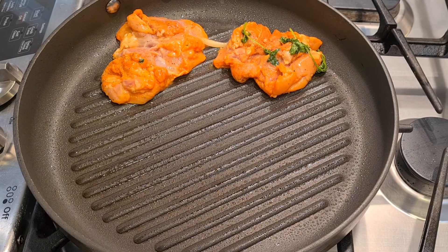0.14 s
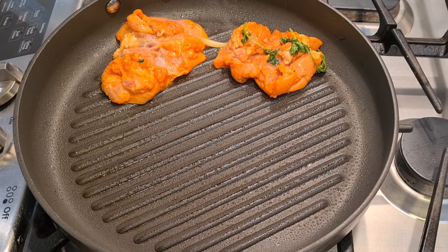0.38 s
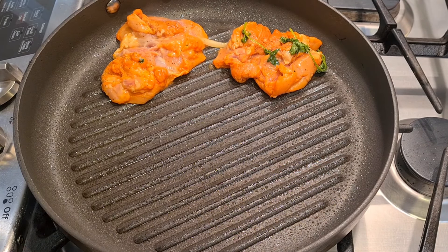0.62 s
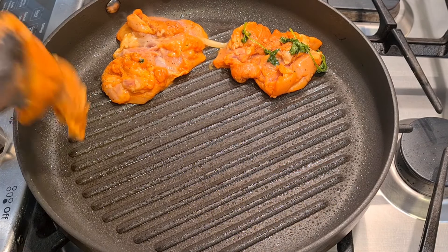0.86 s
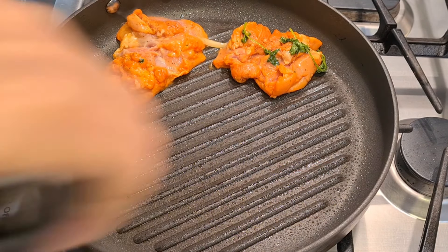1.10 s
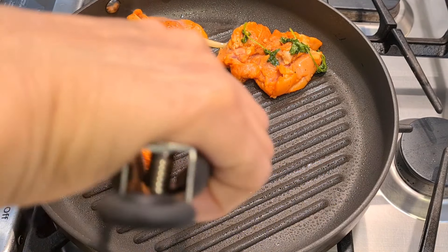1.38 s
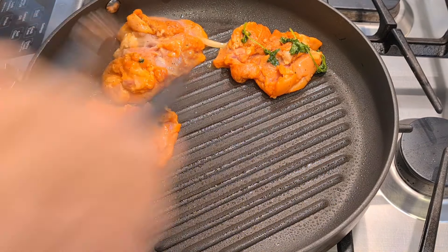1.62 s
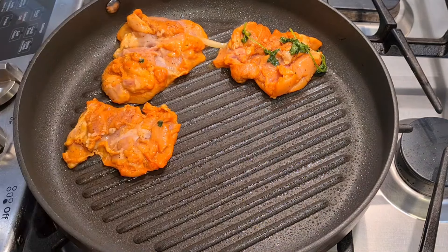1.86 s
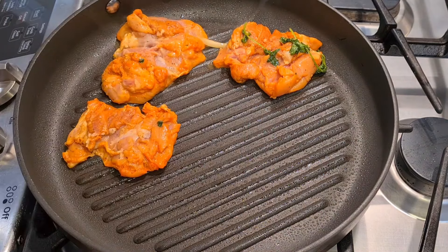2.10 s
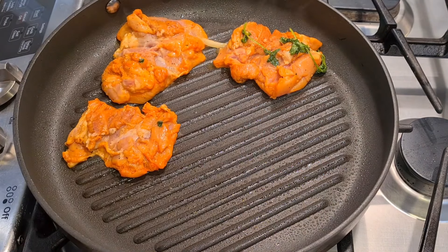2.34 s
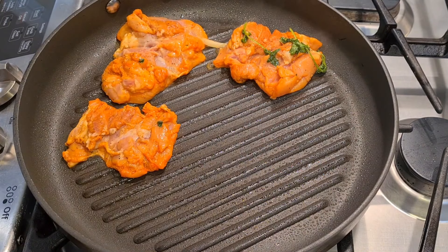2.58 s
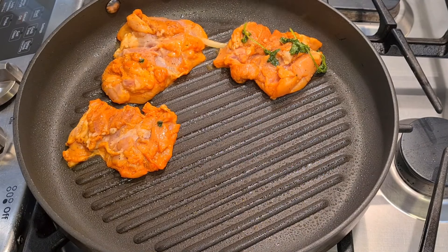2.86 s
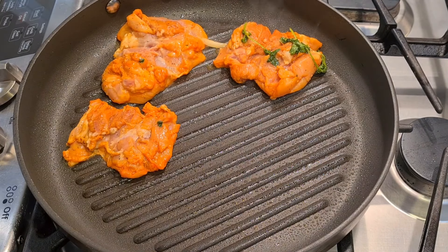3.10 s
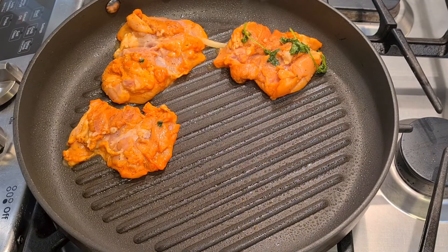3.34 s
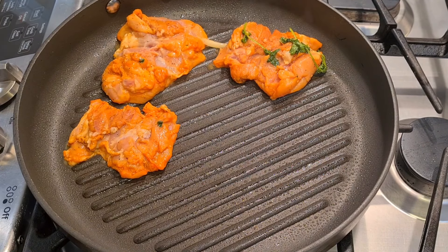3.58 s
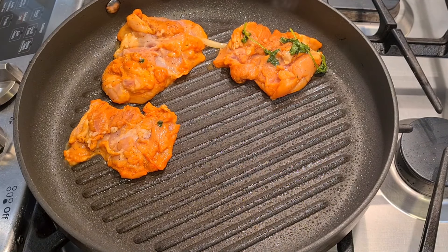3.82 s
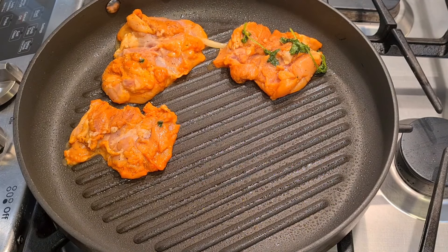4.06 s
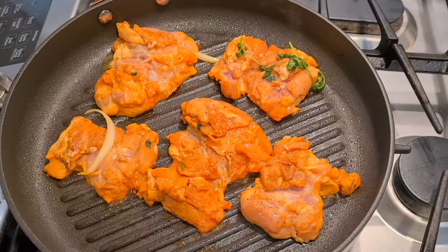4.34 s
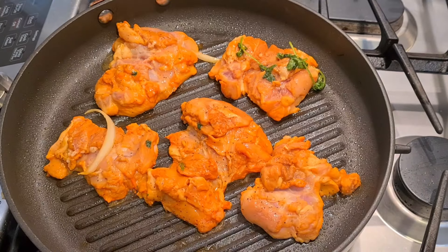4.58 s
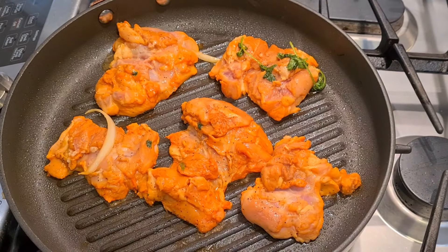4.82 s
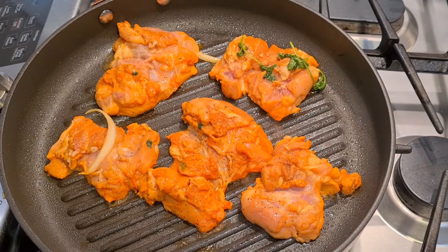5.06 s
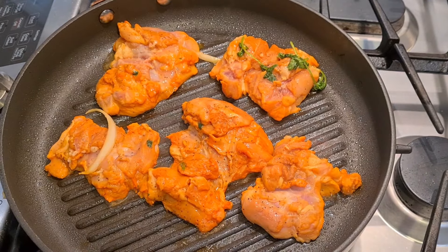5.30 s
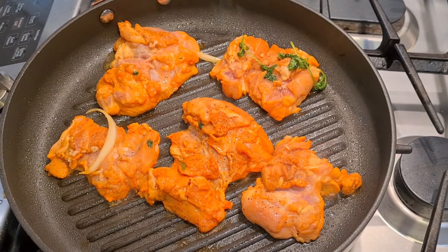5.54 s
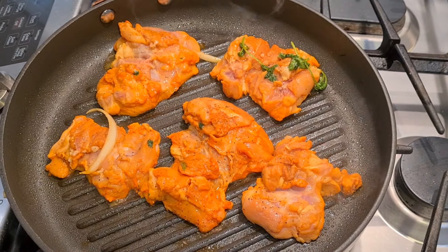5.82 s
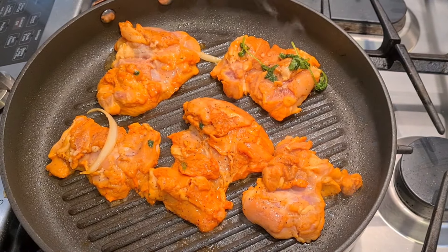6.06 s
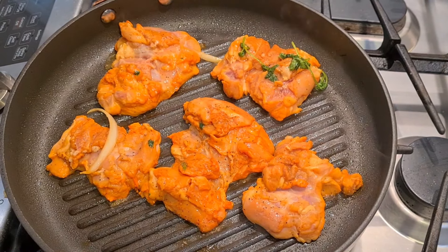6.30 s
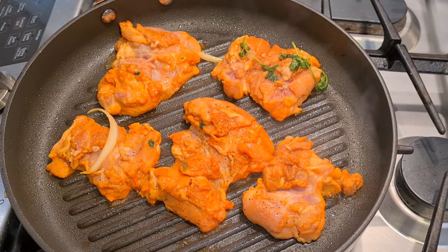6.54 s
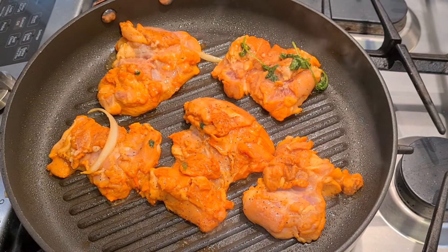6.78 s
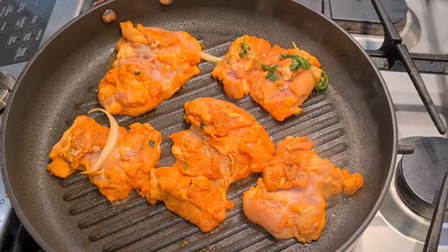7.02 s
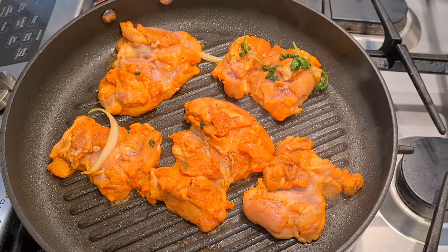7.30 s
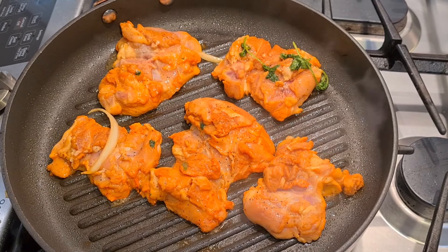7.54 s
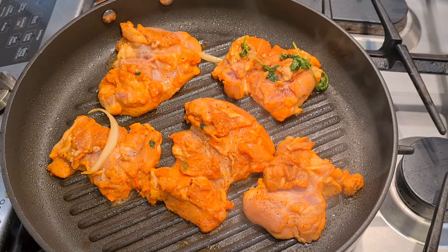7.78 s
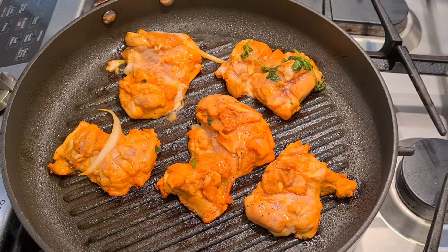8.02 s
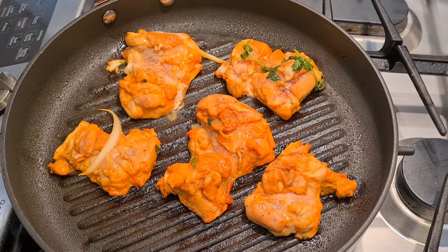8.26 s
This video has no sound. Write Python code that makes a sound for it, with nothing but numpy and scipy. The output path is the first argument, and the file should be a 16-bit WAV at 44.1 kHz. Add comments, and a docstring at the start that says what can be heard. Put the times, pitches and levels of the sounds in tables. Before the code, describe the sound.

Close, bright frying sizzle with crackling fat spits over a faint extractor fan rumble, jumping midway to a smoother, quieter hiss.

```python
"""Marinated meat sizzles on a hot ridged pan just under a two-port microphone in a kitchen. Bursting bubbles
are noise under random bursts; a fresh piece is laid down, then a jump in time leads to a full pan, sizzling
softer. Fat spits in sharp cracks of noise and the iron rings in resonant modes. A hand near the right port
twice throws a close echo; an extractor fan, shaped noise and sines, rumbles and hums beneath; weak lows flicker
in and out."""
import sys
import numpy as np
from scipy import signal
from scipy.fft import rfft, irfft
from scipy.io import wavfile
from scipy.ndimage import uniform_filter1d

SR = 44100
rng = np.random.default_rng(int(sys.argv[2]) if len(sys.argv) > 2 else 0)


def int16_out(signal):
    """Quantize to a 16-bit WAV file."""
    q = np.round(np.clip(np.atleast_2d(signal).T, -1, 1) * 32767)
    wavfile.write(sys.argv[1], SR, q.astype(np.int16))


def attenuation_scalar(level_db):
    """Turn a level in dB into a linear amplitude multiplier (20 dB per decade)."""
    decades = np.asarray(level_db, float) / 20
    return 10 ** decades


N = 369999
WIN, HOP = 1024, 256  # short-time spectra of the sizzle, samples
CALMS_S, JUMP_S = 2.6, 4.743  # the new piece calms; jump in time to the full pan

# level of the sizzle before its lifts and patches: t/s, level/dB
SIZZLE_LEVEL = [(0, -25), (.98, -25.5), (1.04, -27), (1.34, -26), (1.55, -25.5), (1.8, -23.5), (2.2, -23),
                (2.6, -23), (2.84, -23.5), (2.92, -24), (3.75, -24), (3.92, -24.5), (4.735, -25),
                (4.75, -27.5), (6.55, -28.5), (8.2, -28), (8.32, -30.5)]


def curve(table, at, log=False):
    """Columns of a table joined by straight lines, in time or on a log-frequency axis."""
    x, *columns = np.transpose(table)
    bend = np.log if log else np.asarray
    return [np.interp(bend(at), bend(x), c) for c in columns]


def unit(x):
    """Scale to rms 1."""
    return x / np.sqrt(np.mean(np.abs(x) ** 2))


def walk(shape, span):
    """Random drift, smoothed twice over span cells along each axis; rms 1."""
    x = rng.standard_normal(shape)
    for axis, cells in enumerate(span):
        for _ in range(2):
            x = uniform_filter1d(x, max(int(cells), 1), axis=axis)
    return unit(x)


def hump(hz, centre_hz, octaves):
    """Bell on the octave axis, 1 at its centre."""
    return np.exp(-(np.log2(hz / centre_hz) / octaves) ** 2)


def frames(x):
    """Short-time spectra: frequencies, times, cells."""
    return signal.stft(x, SR, nperseg=WIN, noverlap=WIN - HOP)


def bursts(per_s, spread_db, tail_ms, steam):
    """Envelope of bursting bubbles, many small and few large, in flurries over a smooth jet of steam."""
    struck = rng.random(N) < per_s / SR
    size = struck * attenuation_scalar(spread_db * np.minimum(rng.exponential(size=N), 6))
    keep = np.exp(-1000 / (tail_ms * SR))
    pops = unit(signal.lfilter([1], [1, -keep], size))
    flurry_db = 0.1 * walk((N,), (900,)) + 0.51 * walk((N,), (150,))
    return (steam + pops) * attenuation_scalar(flurry_db)


def bubbles():
    """Noise under the bursts: large bubbles carry the lower sizzle, small ones the upper."""
    smooth = np.where(np.arange(N) > JUMP_S * SR, 1.155, 1)  # the full pan hisses smoother
    small = bursts(per_s=2500, spread_db=2.1, tail_ms=.2, steam=3.5 * smooth)
    big = bursts(per_s=1200, spread_db=1.8, tail_ms=.5, steam=5 * smooth)
    hz, s, small = frames(unit(small) * rng.standard_normal((3, N)))
    big = frames(unit(big) * rng.standard_normal((3, N)))[2]
    hz = np.maximum(hz, 1)[:, None]
    # large ones alone sound below 3440 Hz, small ones alone an octave above
    high = np.clip(np.log2(hz / 3440), 0, 1)
    return hz, s, np.sqrt(high) * small + np.sqrt(1 - high) * big


def fresh(s):
    """Share of the new piece in the sizzle, and the rise and fall (0-1) of its first flash of steam."""
    lands_s, take_over_s, flash_peak_s = 1.23, 0.18, 0.11
    age = np.maximum(s - lands_s, 0)
    full_share = np.where(s < CALMS_S, 0.82, 0.88)
    share = full_share * (1 - np.exp(-age / take_over_s))
    flash = age / flash_peak_s * np.exp(1 - age / flash_peak_s)
    return share, flash


def meats(hz, s, share):
    """Each meat colours the sizzle and reaches the ports its own way: power, left-right dB, left's lead ms."""
    # colours of the settled pieces, the new piece and the full pan: f/Hz, relative density/dB per Hz
    settled, spitting, full = [(560, -35), (950, -9), (1300, -6), (1780, -4), (2080, -8), (2300, -5),
                               (3600, -2.5), (4050, -4), (5400, -2.5), (6300, .1), (8000, .1), (10300, -3),
                               (13000, -4), (15000, -7.5), (15900, -10)], [(560, -30), (950, -6), (1060, -7), (1290, -2.5),
                                                (1890, -2.5), (2160, -6), (2740, -2), (4180, .1),
                                                (4710, -.7), (6500, -.4), (10400, -5.5), (13700, -3),
                                                (15000, -5.5), (15900, -8.5)], [(560, -21.5), (950, -14.5), (1190, -12),
                                                                  (1450, -7.5), (1610, -10.5), (2060, -9.5),
                                                                  (2230, -12.5), (3210, -5), (3570, -7.5),
                                                                  (4560, -7), (5370, -6), (8690, -10.5),
                                                                  (13400, -13), (15600, -15)]
    # left port over right, for the same three: f/Hz, level/dB
    settled_side, spitting_side, full_side = [(300, -7), (900, 1.5), (4500, 2), (6300, 5.5), (8200, 12),
                                              (10300, 8), (11800, 2), (14500, -0.5)], [(300, 4), (900, 3.5), (4300, 0),
                                                                    (6000, 2.5), (7900, 8), (10300, 1.5),
                                                                    (12000, -4.5), (14500, -6)], [(300, -1),
                                                                                           (900, 2.5),
                                                                                           (4200, 2.5),
                                                                                           (5500, 5),
                                                                                           (7800, 10),
                                                                                           (9000, 9),
                                                                                           (10300, 7.5),
                                                                                           (11300, -1),
                                                                                           (14500, -1)]
    # time by which the left port leads, one value each for the same three [ms]
    left_lead = (.09, .17, .1)
    late = s > JUMP_S
    colours = settled, spitting, full
    sides = settled_side, spitting_side, full_side
    weights = (1 - share) * ~late, share * ~late, late
    power, side_db, lead_ms = 0, 0, 0
    for colour, side, weight, ms in zip(colours, sides, weights, left_lead):
        shape = attenuation_scalar(curve(colour, hz, log=True)[0]) ** 2
        power = power + weight * shape / shape.mean(axis=0)
        side_db = side_db + weight * curve(side, hz, log=True)[0]
        lead_ms = lead_ms + weight * ms
    return power, side_db, lead_ms


def passing_lifts(hz, s, flash):
    """Steam, flaring juice and crowding bubbles lift ranges of pitch; others stand out or fall back, in dB."""
    # juice runs onto hot iron and flares at once, then dies away: t/s, lift/dB
    flares = [(1.45, 1), (1.53, 1), (1.66, 1), (1.8, 1.5), (2.217, 2.5), (2.457, 2)]
    # for a while one range of pitch stands out or falls back:
    # from t/s, to t/s, centre f/Hz, width/octaves, level/dB
    pitch_ranges = [(0, .8, 2800, 0.54, -1), (1.6, 2.1, 4150, 0.27, -2), (1.8, 2.603, 12200, .4, 1.5),
                    (2.2, 3.9, 3130, 0.48, 1), (3.1, 4.103, 1390, 0.74, -0.8)]
    early, calm = s <= JUMP_S, s >= CALMS_S
    # bubbles of one size crowd into a band, first with the flash of steam, then steadily
    bubble_hz = np.where(calm, 8600, 6100)
    bubble_db = np.where(calm, 1.6, 0.5 * flash)
    lift_db = bubble_db * early * hump(hz, bubble_hz, .35)
    # the flash also lifts the lows, fully below 2 kHz
    lift_db = lift_db + 1.5 * flash ** 2 * np.clip(np.log2(4000 / hz), 0, 1)
    # finest bubbles once the new piece has calmed
    lift_db = lift_db + 2.5 * (calm & early) * hump(hz, 11900, .25)
    # the sizzle swells briefly around 1.4 kHz
    lift_db = lift_db + 5.5 * np.exp(-((s - 1.64) / 0.13) ** 2) * hump(hz, 1360, 0.15)
    fade_s = 0.25
    flare_db = sum(db * (s >= at) * np.exp(-np.abs(s - at) / fade_s) for at, db in flares)
    lift_db = lift_db + flare_db * hump(hz, 5630, 0.76)
    for start, end, centre_hz, octaves, db in pitch_ranges:
        on = np.clip(np.minimum(s - start, end - s) / .1 + .5, 0, 1)
        lift_db = lift_db + db * on * hump(hz, centre_hz, octaves)
    return lift_db


def hand(s):
    """Delay (ms), strength and low lift (dB) of the close echo: stronger and earlier as the hand nears."""
    # drifts towards the right port: start t/s, time to arrive/s, end t/s, echo strength/0-1, low lift/dB
    visits = [(3.76, 0.25, 4.743, 0.28, 5.5), (7.6, 0.9, 8.25, 0.37, 10)]
    start_ms, shrink_ms, slows_s = 0.282, 0.067, 0.39
    delay_ms, echo, cup_db = 0, 0, 0
    for start, arrive, end, strength, lift_db in visits:
        near = (s > start) & (s < end)
        closing = 1 - np.exp(-np.abs(s - start) / slows_s)
        delay_ms = delay_ms + near * (start_ms - shrink_ms * closing)
        arrived = near * np.clip((s - start) / arrive, 0, 1)
        echo, cup_db = echo + strength * arrived, cup_db + lift_db * arrived
    return delay_ms, echo, cup_db


def cupped(right, hz, s):
    """The hand at the right port adds a delayed copy, lifts the treble and resonates like a cup."""
    delay_ms, echo, cup_db = hand(s)
    right = right * (1 + echo * np.exp(-2j * np.pi * hz * delay_ms / 1000))
    treble = np.clip(np.log2(hz / 7000), 0, 1)
    right = right * attenuation_scalar(10.5 * echo * treble)  # dB per unit of echo strength, full from 14 kHz
    return right * attenuation_scalar(cup_db * hump(hz, 1490, 0.38))


def sizzle():
    """Bubble bursts coloured by whichever meat makes them, partly alike at the two ports."""
    # likeness of the ports: f/Hz, shared power/0-1
    likeness = [(300, .5), (900, .45), (1150, .62), (1600, .6), (1900, .45), (2300, .25), (4000, .24),
                (6000, .12), (9000, .22), (15000, .08)]
    hz, s, (common, left, right) = bubbles()
    share, flash = fresh(s)
    power, side_db, lead_ms = meats(hz, s, share)
    # patches of the pan flare up and die down, each with its own range of pitch
    patchy_db = 0.23 * walk(power.shape, (30, 8)) + .5 * walk(power.shape, (80, 3))
    level_db = curve(SIZZLE_LEVEL, s)[0] + passing_lifts(hz, s, flash) + patchy_db
    gain = unit(np.sqrt(power)) * attenuation_scalar(level_db)
    alike = curve(likeness, hz, log=True)[0]
    lead = np.exp(2j * np.pi * hz * lead_ms / 1000)
    left = np.sqrt(alike) * common * lead + np.sqrt(1 - alike) * left
    right = cupped(np.sqrt(alike) * common + np.sqrt(1 - alike) * right, hz, s)
    right_share = 1 / (1 + attenuation_scalar(side_db) ** 2)
    balanced = np.array([left * np.sqrt(1 - right_share), right * np.sqrt(right_share)])
    ports = gain * np.sqrt(2) * balanced
    return signal.istft(ports, SR, nperseg=WIN, noverlap=WIN - HOP)[1][:, :N]


def spits():
    """Each spit of fat is a sharp broad crack, much alike at both ports; small ones come at random."""
    # larger fat spits: t/s, peak level/dB, left over right/dB
    large = [(.410, -14, 5), (.478, -13, 4), (.681, -13, 4), (1.327, -16, 2), (1.594, -15, -2),
             (1.602, -15, 2), (1.6605, -13, 4), (1.715, -13, 2), (1.835, -9, 2), (1.851, -10, 2),
             (2.133, -11, 2), (2.305, -11, 2), (2.567, -10, 1), (2.585, -11, 1), (3.153, -12, 0),
             (4.289, -12, -3), (4.346, -12, -2), (5.831, -14, 3), (6.284, -16, 3), (7.350, -16, 3),
             (1.756, -11, 3), (1.8015, -8, 1), (2.007, -11, 2), (2.017, -9, 2), (2.218, -10, 3),
             (2.4565, -11, 1), (2.661, -12, 1), (2.731, -9, 2), (2.776, -12, -1), (2.8342, -4, 2),
             (3.005, -9, -4), (3.562, -11, -4), (4.126, -11, 4), (4.605, -10, -4), (.518, -15, 5),
             (1.175, -16, 3), (1.896, -12, 0), (2.2766, -12, -1), (3.1865, -11, 0), (3.3356, -14, -3),
             (3.6315, -13, -3), (3.68, -13, 4), (4.0285, -13, 4), (4.5145, -13, 3), (4.7233, -12, -3),
             (5.5023, -16, 3), (6.0892, -17, 3), (7.1, -16, 3)]
    out, t = np.zeros((2, N)), np.arange(160) / SR
    small = rng.random((int(22 * JUMP_S), 3))  # 22 per second until the pan is full
    at = small[:, 0] * JUMP_S
    small_db = curve(SIZZLE_LEVEL, at)[0] + 11 + 4 * (small[:, 1] - .5)  # peaks 9 to 13 dB over that level
    rows = large + list(zip(at, small_db, 8 * small[:, 2] - 2))
    crack = rng.standard_normal((len(rows), 3, 160)) * np.exp(-t / .0004)
    crack = crack[:, :1] + .8 * crack[:, 1:]  # one common part, one of each port's own
    crack = signal.lfilter(*signal.butter(1, [2000, 13000], "band", fs=SR), crack)
    for (s, db, pan_db), burst in zip(rows, crack):
        peak = attenuation_scalar(db + np.array([[pan_db], [-pan_db]]) / 2)
        start = int(s * SR)
        out[:, start:start + 160] += peak * burst / np.abs(burst).max(axis=1, keepdims=True)
    return out


def iron():
    """The boiling juice shakes the pan, which answers in its modes, almost alike at both ports."""
    # modes of the pan, lowest first, a broad one last: f/Hz, width/Hz, relative level/dB
    pan_modes = [(460.4, 14, -0.5), (616, 60, -6), (781, 45, -6.5), (930, 90, -5.5), (685, 520, -8)]
    # level of the whole ring: t/s, level/dB
    ring_level = [(0, -59.5), (1.28, -56), (1.36, -47.5), (1.92, -46), (2.5, -48), (2.65, -49.5),
                  (3.6, -50.5), (3.9, -53.5), (4.71, -52), (4.8, -62.5), (8.39, -61)]
    # lift of the upper modes against the lowest: t/s, level/dB
    upper_lift = [(0, -3.5), (1.3, -3.5), (1.45, -5), (1.65, 3), (2.5, 2.5), (3.3, -1), (4.2, 3), (4.7, -3),
                  (8.39, -3)]
    t = np.arange(N) / SR
    shake = rng.standard_normal((3, N))
    shake = shake[0] + .5 * shake[1:]
    modes = []
    for hz, width, db in pan_modes:
        mode = unit(signal.lfilter(*signal.iirpeak(hz, hz / width, SR), shake, axis=1))
        modes.append(attenuation_scalar(db) * mode * attenuation_scalar(0.5 * walk((N,), (1500,))))  # each flutters on its own
    upper = sum(modes[1:]) * attenuation_scalar(2.5 * np.array([[.5], [-.5]]))  # left over right, dB
    upper = np.array([upper[0], np.roll(upper[1], 6)])  # left leads by 6 samples
    ring = modes[0] + upper * attenuation_scalar(curve(upper_lift, t)[0])
    return ring * attenuation_scalar(curve(ring_level, t)[0] + 0.1 * walk((N,), (3500,)))


def fan():
    """Moved air is shaped noise, the motor three wavering sines; the deepest part swells, all a little right."""
    # colour of the rush of air: f/Hz, relative density/dB per Hz
    air_colour = [(15, 4), (30, -8), (60, 2), (130, -2.5), (180, -10), (250, -9.5), (330, -8), (420, -14),
                  (520, -5.5), (900, -5), (1300, -25)]
    # swell of the deepest rumble and lowest hum: t/s, relative level/dB
    deep_swell = [(0, 0.5), (.7, -3.5), (1.9, -5), (2.2, -2), (4.3, 0), (5.1, -6), (6.5, -1.5),
                  (8.39, -2.5)]
    # murmur between 180 and 540 Hz, and the highest hum: t/s, relative level/dB
    murmur_level = [(0, 2), (1.5, 3), (1.65, -3), (2.55, -6.5), (2.8, 5), (3.45, 0.5), (3.6, -5),
                    (3.8, 0.5), (3.92, -11), (4.3, -9), (4.45, 1.5), (4.8, 1.5), (7.3, 1.5), (8.39, -2.5)]
    # hum of the motor before it wavers, swells and is panned: f/Hz, rms level/dB
    hum_tones = [(59.2, -58), (138, -64.5), (359.5, -66)]
    air = rng.standard_normal((3, N))
    hz = np.maximum(np.fft.rfftfreq(N, 1 / SR), 1)
    t = np.arange(N) / SR
    swell = attenuation_scalar(curve(deep_swell, t)[0] + walk((N,), (3000,)))
    murmur_db = curve(murmur_level, t)[0]
    rush = rfft(air[0] + 0.72 * air[1:]) * attenuation_scalar(curve(air_colour, hz, log=True)[0])
    rush = rush * (hz < 1500) * (hz > 15)
    in_murmur = (hz > 180) & (hz < 540)
    steady = irfft(rush * (hz >= 90) * ~in_murmur, N)
    deep = irfft(rush * (hz < 90), N) * swell
    murmur = irfft(rush * in_murmur, N) * attenuation_scalar(murmur_db + 2 * walk((N,), (1300,)))
    hum = []
    for f, db in hum_tones:
        waver_db = 4.1 * walk((2, N), (1, 6000))
        hum.append(attenuation_scalar(db + waver_db) * np.sqrt(2) * np.sin(2 * np.pi * f * t))
    rush = unit(steady + deep + murmur) * attenuation_scalar(-47.5)
    motor = hum[0] * swell + hum[1] + hum[2] * attenuation_scalar(murmur_db)
    return (rush + motor) * attenuation_scalar(np.array([[-.6], [.6]]))


def scene():
    """Everything at the two ports."""
    return sizzle() + spits() + iron() + fan()


def lows_thinned(dry):
    """Weak low components flicker in and out, moment by moment; the top is cut."""
    # threshold against the size of the sizzle: f/Hz, level/dB
    threshold = [(20, -17), (100, -14.5), (150, -11.5), (200, -12.5), (250, -11.5), (305, -2.5),
                 (360, -8.5), (410, -3), (460, -6.5), (540, -2), (620, -8.5), (700, -6), (780, -7.5),
                 (880, -0.5), (1000, -13), (1100, -8), (1500, -37)]
    # the lows drop out briefly: from t/s, to t/s, from f/Hz, to f/Hz
    dropouts = [(.02, .07, 200, 420), (.27, .3, 200, 560), (.44, .49, 190, 560), (.57, .61, 190, 700),
                (.68, .695, 0, 200), (.74, .84, 400, 600), (1.87, 1.885, 0, 150), (1.99, 2.01, 0, 250),
                (2.13, 2.16, 0, 90), (2.54, 2.61, 190, 560), (2.675, 2.7, 0, 330), (2.86, 2.87, 200, 900),
                (3.11, 3.19, 200, 400), (3.165, 3.19, 0, 800), (3.55, 3.67, 200, 400),
                (3.79, 3.83, 380, 560), (3.82, 3.835, 0, 200), (3.81, 4.4, 210, 400), (3.9, 4.24, 380, 560),
                (4.49, 4.6, 150, 400), (8.02, 8.06, 250, 560)]
    top_hz = 16000
    hz, s, z = signal.stft(dry, SR, window="cosine", nperseg=1536, noverlap=768)
    in_sizzle = (hz > 2000) & (hz < top_hz)
    sizzle_size = np.sqrt(np.mean(np.abs(z[:, in_sizzle]) ** 2, axis=(0, 1)))
    limit = sizzle_size * attenuation_scalar(curve(threshold, np.maximum(hz, 1), log=True)[0])[:, None]
    # the threshold drifts band by band and jerks in all bands at once, dB
    limit = limit * attenuation_scalar(1.5 * walk(limit.shape, (4, 2)) + 1.5 * walk(sizzle_size.shape, (1,)))
    # at a sharp crack more of the lows drop out for a moment: 4 dB per dB of crest over 13 dB
    padded = np.abs(np.pad(dry, ((0, 0), (384, 2304)))).max(axis=0)
    heard = padded[:768 * z.shape[2]].reshape(-1, 768)
    heard_rms = np.sqrt(np.mean(heard ** 2, axis=1) + 1e-12)
    crest_db = 20 * np.log10(heard.max(axis=1) / heard_rms + 1e-9)
    limit = limit * attenuation_scalar(4 * np.clip(crest_db - 13, 0, 4))
    # weak components just below a strong ring in pitch drop out too
    ring_size = np.abs(z[:, (hz > 430) & (hz < 490)]).mean(axis=(0, 1))
    ring_size = uniform_filter1d(ring_size, size=9)
    under_ring = ((hz > 190) & (hz < 400))[:, None]
    limit = np.hypot(limit, ring_size * attenuation_scalar(-8.5) * under_ring)
    kept = (np.abs(z) > limit) | (hz > 1500)[:, None]
    for start, end, low_hz, high_hz in dropouts:
        band = ((hz >= low_hz) & (hz < high_hz))[:, None]
        kept = kept & ~(band & (s > start - .004) & (s < end + .004))
    z = z * kept * (hz < top_hz)[:, None]
    return signal.istft(z, SR, window="cosine", nperseg=1536, noverlap=768)[1][:, :N]


def top_cut(x):
    """Nothing passes above the cut-off."""
    return signal.sosfilt(signal.butter(12, 17070, fs=SR, output="sos"), x)


def record(dry):
    """The sound at the ports loses its weak lows and its top, and is stored."""
    mix = lows_thinned(dry)
    return top_cut(mix)


dry = scene()
out = record(dry)
int16_out(out)
```